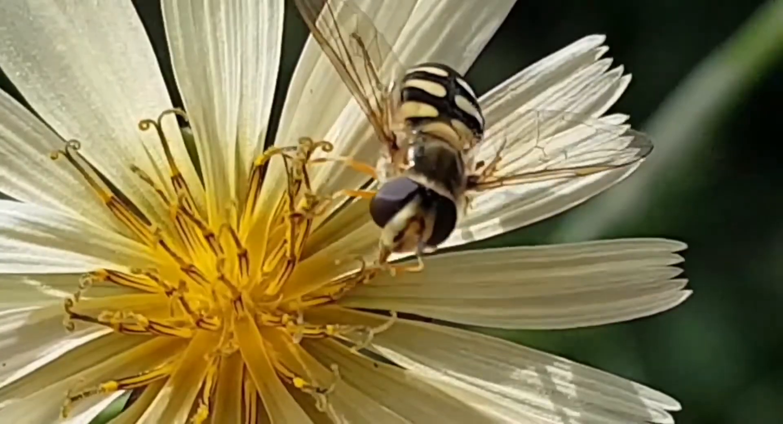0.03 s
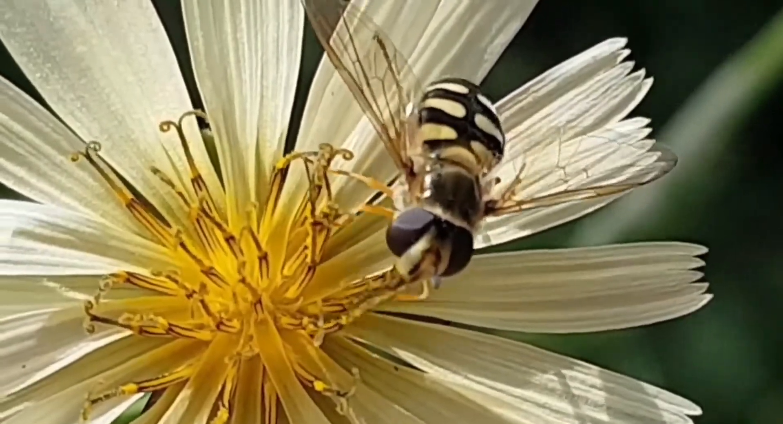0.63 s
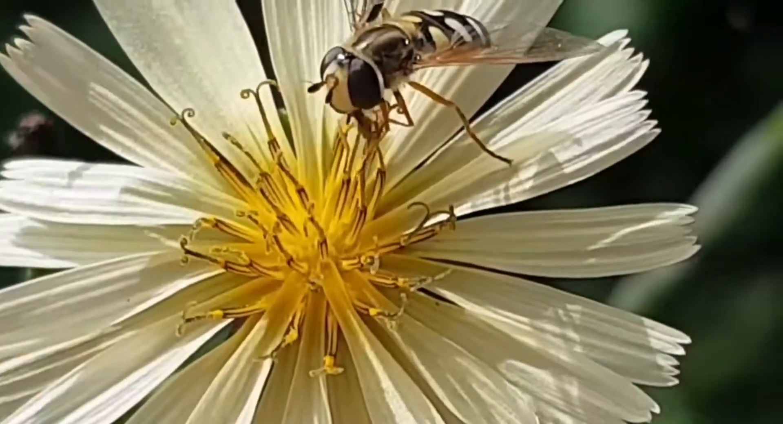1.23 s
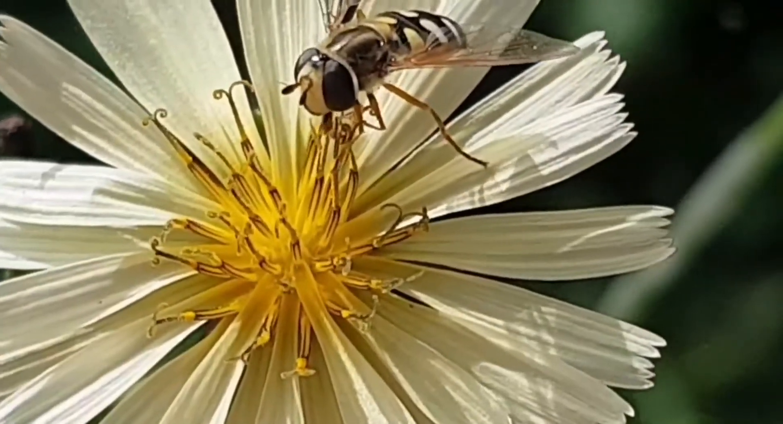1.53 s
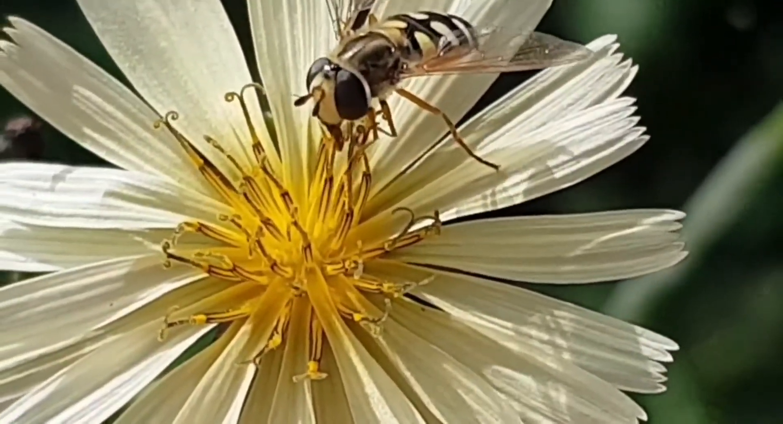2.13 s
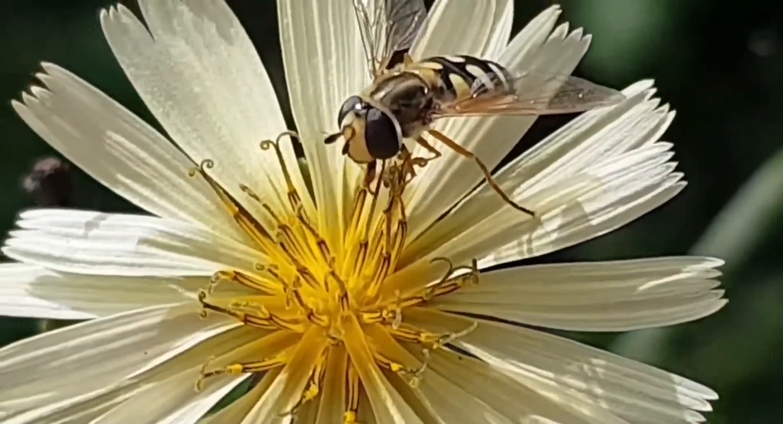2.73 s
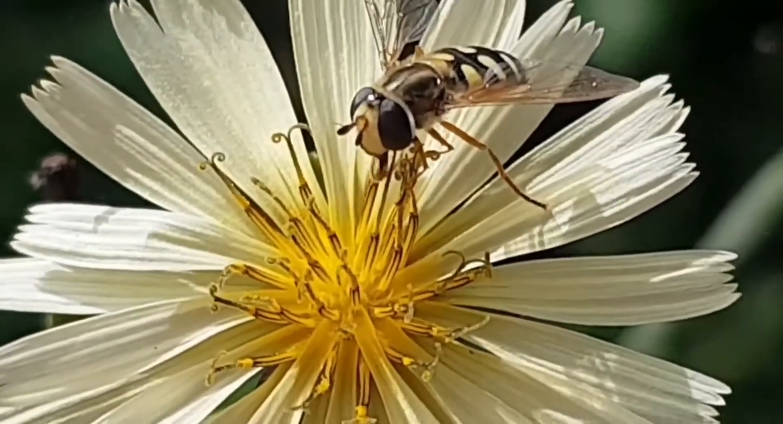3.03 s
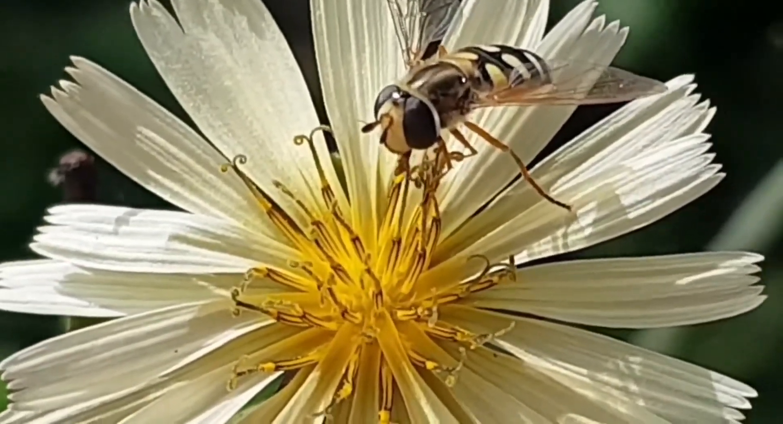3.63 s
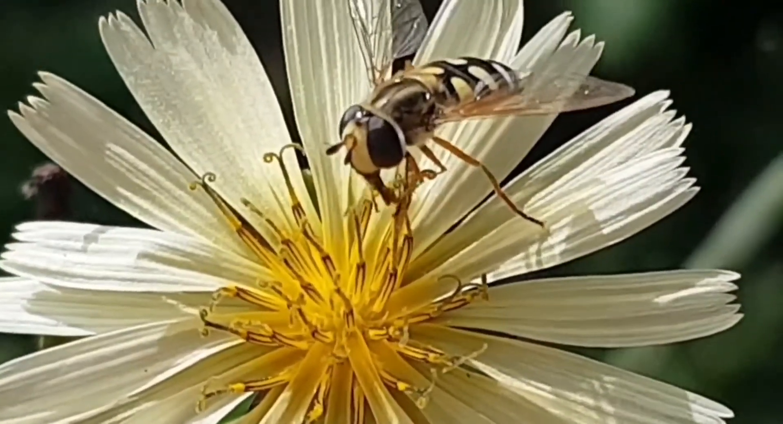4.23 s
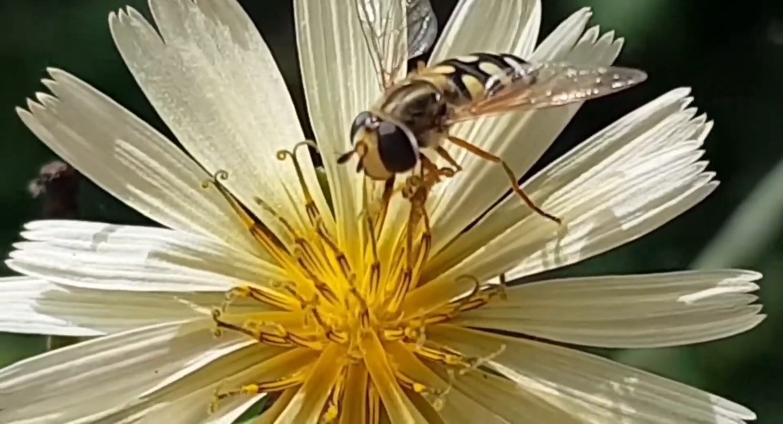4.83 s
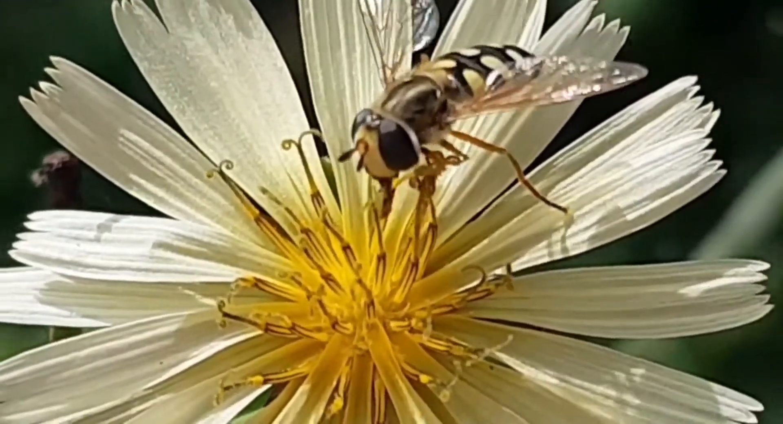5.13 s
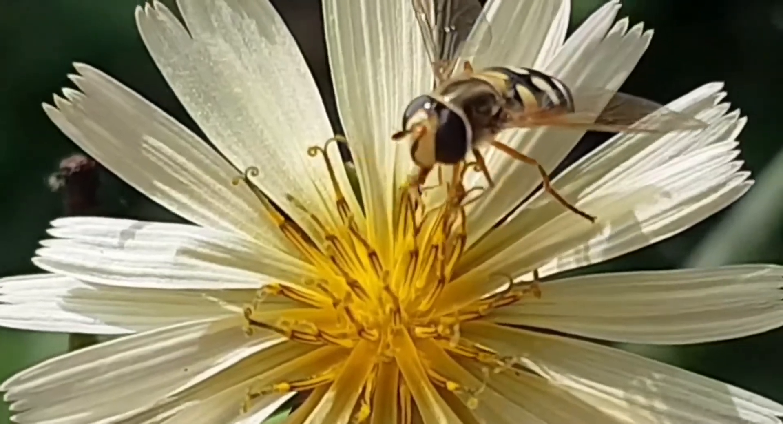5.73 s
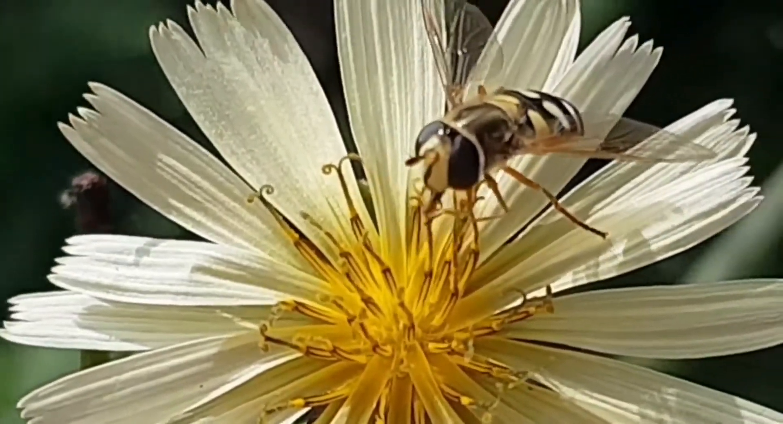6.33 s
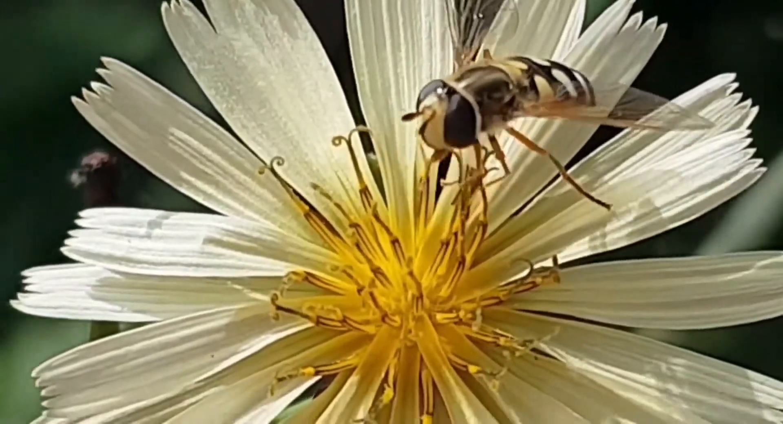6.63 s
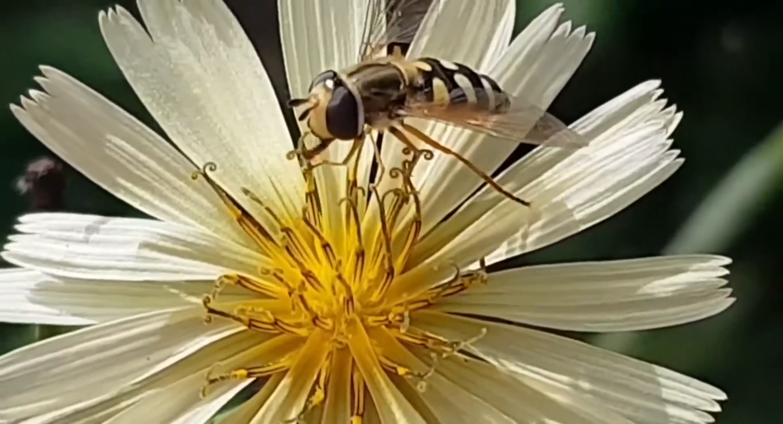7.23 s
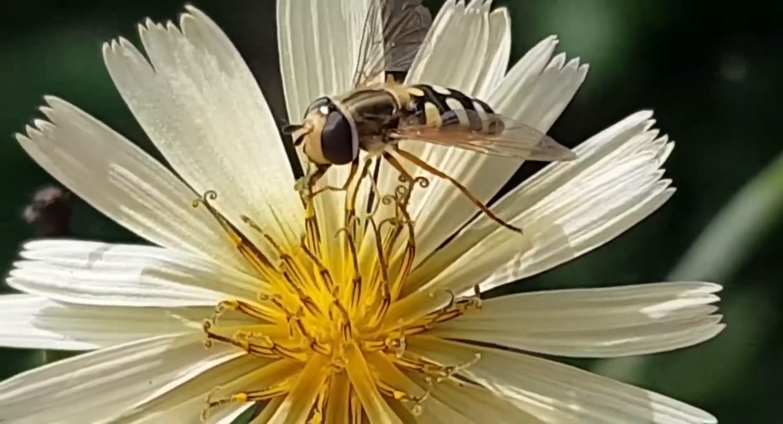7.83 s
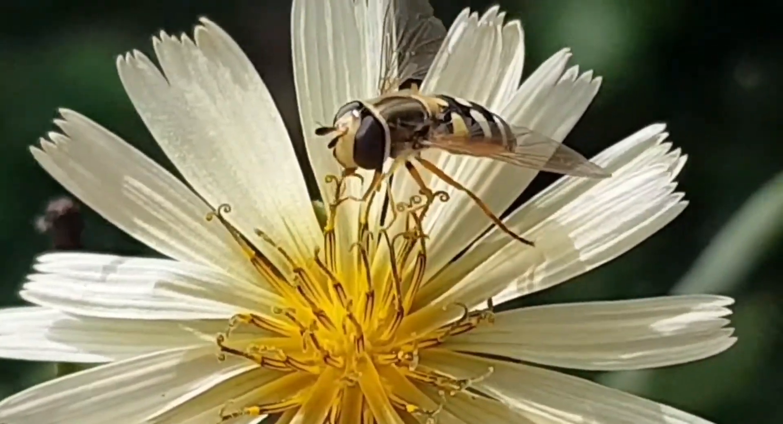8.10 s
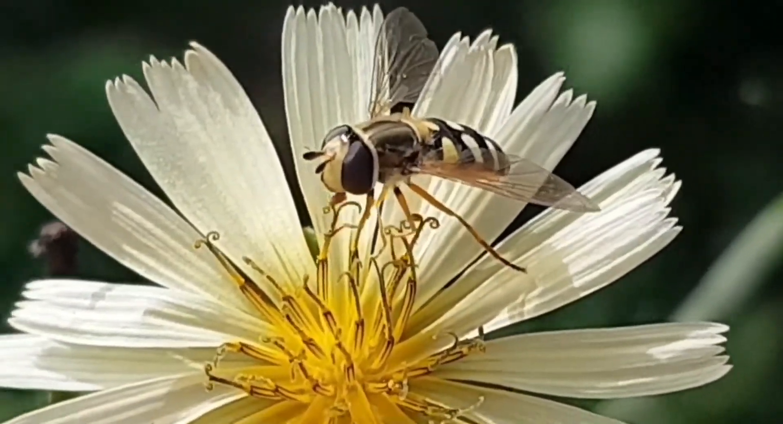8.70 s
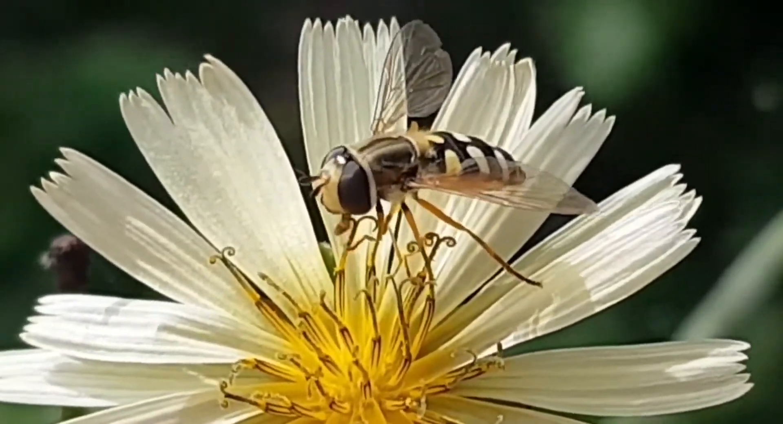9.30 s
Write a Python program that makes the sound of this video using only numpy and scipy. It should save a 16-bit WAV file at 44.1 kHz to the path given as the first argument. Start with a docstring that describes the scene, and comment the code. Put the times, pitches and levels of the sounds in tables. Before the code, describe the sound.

Crickets trill and chirp over pulsing cicadas outdoors, with distant traffic and a low, gusting rumble like wind underneath.

```python
"""A fast, high cricket trill opens on a summer field edge, over far crickets, cicadas and a distant road.
Crickets scrape their wings in short falling tones; cicadas click their ringing bodies in swelling phrases.
Tyres roar, vehicle bodies boom, and a far engine drones under a low, gusting rumble like wind.
A field cricket joins in bouts of chirps. At 1.16 s the level dips briefly and the fast trill gives way
to a slower, lower one. From there a few vehicles swell past and one hums away into the distance."""
import sys
import numpy as np
from scipy import signal
from scipy.fft import rfft, irfft, next_fast_len
from scipy.io import wavfile
from scipy.ndimage import uniform_filter1d, map_coordinates

SR = 44100
rng = np.random.default_rng(int(sys.argv[2]) if len(sys.argv) > 2 else 0)


def bounce(signal):
    """Save signal as a 16-bit WAV file at the path given by the first command-line argument."""
    frames = np.transpose(np.atleast_2d(signal))
    limited = np.clip(frames, -1, 1)
    pcm = np.round(limited * 32767).astype(np.int16)
    wavfile.write(sys.argv[1], SR, pcm)


N = 421596
T = np.arange(N) / SR
HANDOVER_S = 1.162  # the fast trill gives way to the slow one


def amp(db):
    """Decibels to gain."""
    return 10 ** (np.asarray(db) / 20)


def unit(x):
    """Scale to rms 1."""
    return x / np.sqrt(np.mean(x ** 2) + 1e-20)


def along(points, hz):
    """Read (frequency, value) points on a log frequency axis."""
    freqs, values = np.transpose(points)
    return np.interp(np.log(hz + 1), np.log(freqs + 1), values)


def curves(rows):
    """One automation curve for each column after the time."""
    times, *columns = np.transpose(rows)
    return [np.interp(T, times, column) for column in columns]


def wobble(rate):
    """A smooth random curve, rate knots a second."""
    return map_coordinates(rng.standard_normal(int(N * rate / SR) + 4), [T * rate])


def filtered(x, response):
    """Filter x by a complex frequency response."""
    size = next_fast_len(N + SR // 4)
    return irfft(rfft(x, size) * response(np.fft.rfftfreq(size, 1 / SR)), size)[..., :N]


def coloured(x, spectrum):
    """x through an EQ curve, at rms 1."""
    return unit(filtered(x, lambda hz: amp(along(spectrum, hz))))


def strokes(times, level_db, length_s, top_hz, fall_hz, bend, taper, scatter_db,
            fall_spread=0, rasp=0, swell=0, rise_hz=0):
    """Wing strokes: the tone rises as the scraper gets going and falls as it slows; uneven teeth rasp."""
    progress = np.linspace(0, 1, int(length_s * SR))
    detune, phase, accent, jitter, droop = rng.standard_normal((len(times), 5)).T
    run_up = rise_hz * (1 - progress) ** 6
    fall = fall_hz * (1 + fall_spread * droop[:, None]) * progress ** bend
    pitch = (top_hz - run_up - fall) * (1 + .0014 * detune[:, None])
    onset = np.round((times - length_s / 2 + .0004 * jitter) * SR).astype(int)
    samples = np.clip(onset[:, None] + np.arange(len(progress)), 0, N)
    teeth = unit(uniform_filter1d(rng.standard_normal(N + 1), size=48))[samples]
    tone = np.sin(2 * np.pi * (np.cumsum(pitch, axis=1) / SR + phase[:, None]) + rasp * teeth)
    gain = np.sqrt(2) * amp(level_db + scatter_db * accent)
    pressure = signal.windows.tukey(len(progress), taper) * (1 + swell * (progress - .5))
    return np.bincount(samples.ravel(), (gain[:, None] * tone * pressure).ravel(), N + 1)[:N]


# Reverb of the leaves: (frequency [Hz], time to fade by 60 dB [s])
LEAF_DECAY = [(3000, 0.061), (8000, 0.18), (14000, 0.045)]
def foliage(x):
    """A scattered stereo echo that drifts between two tails as the leaves move."""
    hz, t, noise = signal.stft(rng.standard_normal((2, 2, SR // 3)), SR, nperseg=256)
    decay = amp(-60 * t / along(LEAF_DECAY, hz)[:, None])
    tails = signal.istft(noise * decay, SR, nperseg=256)[1]
    tails /= np.linalg.norm(tails, axis=-1, keepdims=True)
    echo_a, echo_b = signal.oaconvolve(x[None, None], tails, axes=-1)[..., :N]
    turn = np.pi * (T + wobble(.99))
    return np.cos(turn) * echo_a + np.sin(turn) * echo_b


def fast_trill():
    """A high cricket at about 28 strokes a second; a reflection on the left trails each stroke."""
    times = np.arange(.0152, HANDOVER_S - .02, 1 / 27.885)
    song = strokes(times, level_db=-48.7, length_s=.0195, top_hz=6595, fall_hz=240,
                   bend=.65, taper=1, scatter_db=.5)
    reflection = amp(-4.5) * np.interp(T - .00841, T, song)
    stereo = np.array([song * amp(-1.5) + reflection, song])
    return (stereo + amp(-12) * foliage(song)) * (T < HANDOVER_S)


# Far crickets merged into one band: (frequency [Hz], relative level [dB])
CHORUS_EQ = [(3500, -70), (4300, -52), (4850, -16), (5080, -13), (5280, -17), (5480, -5), (5750, -15),
             (6100, -18), (7500, -70)]
def far_crickets():
    """A shimmering chorus, a far trill that steps up at the handover, and one cricket's two strokes."""
    chorus_db = -71 + 2 * (T > HANDOVER_S) + 5.6 * np.tanh(wobble(45))
    chorus = amp(chorus_db) * coloured(rng.standard_normal((2, N)), CHORUS_EQ)
    times = np.arange(.047, N / SR, 1 / 18.9)
    trill = strokes(times, level_db=np.where(times < HANDOVER_S, -73, -66), length_s=.02,
                    top_hz=5100, fall_hz=400, bend=2, taper=.7, scatter_db=2)
    pair = strokes(np.array([.027, .071]), level_db=-58, length_s=.025, top_hz=5950, fall_hz=130,
                   bend=1.3, taper=.69, scatter_db=0)
    return chorus + trill * amp([[0], [-3]]) + amp(-2) * foliage(trill) + pair


# Ring of a cicada's body: (frequency [Hz], relative level [dB])
CICADA_EQ = [(5800, -24.5), (6400, -19.5), (6900, -11), (7350, 2), (7520, -2), (7720, 3.5), (7900, -2.5),
             (8070, -1), (8300, -10.5), (8550, -14.5), (8800, -17.5), (9300, -22), (11300, -21.5),
             (12200, -68)]
def tymbal(rate_hz, unsteady):
    """Unsteady clicks, as overtones around the 14th, ring a cicada's body and scatter in the trees."""
    jitter = unsteady * (wobble(260) + wobble(45) / 2)
    phase = 2 * np.pi * np.cumsum(rate_hz * (1 + jitter)) / SR
    overtones = sum(amp(-.75 * (k - 14) ** 2) * np.cos(k * phase) for k in range(11, 18))
    clicks = coloured(overtones, CICADA_EQ)
    return unit(clicks + amp(-9) * foliage(clicks))


# Back-to-back phrases: (start [s], click rate it sags towards [Hz], lull before it [dB])
CICADA_PHRASES = [(0, 569, -4), (0.419, 560, -4), (.85, 568, -6.5), (1.17, 527, -1), (1.56, 560, -1.5),
                  (1.94, 560, -3.5), (2.31, 558, -2.5), (2.69, 556, -3), (3.04, 564, -3.5),
                  (3.441, 569, -4.5), (3.84, 558, -2), (4.18, 563, -4), (4.56, 562, -6), (4.95, 560, -5),
                  (5.33, 560, -4.5), (5.72, 569, -6), (6.11, 566, -8), (6.53, 556, -5), (6.97, 558, -4.5),
                  (7.42, 549, -2), (7.67, 523.8, 0), (8.62, 541, 0), (9.06, 559, -3), (9.451, 560, -3.5)]
# How hard the cicadas sing: (time [s], relative level [dB], trim on the right [dB])
CICADA_EFFORT = [(0, -53.5, -2), (.65, -54.5, -0.5), (1.05, -53.5, -0.5), (1.75, -54.5, 3),
                 (2.15, -55.5, 1), (2.5, -54, 2), (2.9, -54.5, 1), (3.25, -54.5, .5), (4, -53.5, 0.5),
                 (4.4, -52.5, -2), (5.2, -53, 1), (5.55, -51.5, -1.5), (5.95, -51, -1), (6.3, -52.5, -3),
                 (6.75, -55.5, 1), (7.3, -53.5, -1), (7.65, -54, 1), (8.03, -51, -2), (8.17, -55, 2),
                 (8.45, -52.5, -1), (8.8, -53, 1), (9.3, -54, -2.5), (9.56, -54, 2)]
# How the cicadas sound on the right, dipping deep at 7-8 kHz: (frequency [Hz], gain [dB])
RIGHT_EQ = [(6000, -5), (7000, -16), (7500, -16), (8050, -7.5), (8500, -4), (9200, 6), (11000, -7)]
def cicadas():
    """A lead singer whose click rate sags through each phrase, a steadier neighbour and a far blur."""
    attack_s, release_s, neighbour_share = .12, .096, .42
    start, settled_hz, lull_db = np.transpose(CICADA_PHRASES)
    phrase = np.searchsorted(start, T, side="right") - 1
    age = T - start[phrase]
    length = np.diff(start, append=T[-1] + .19)[phrase]
    # In a longer phrase the lead sets out faster, runs steadier and stands out more.
    sag = 1 + (.035 + .024 * length) * np.exp(-age / .3)
    lead = tymbal(settled_hz[phrase] * sag, unsteady=.019 * np.exp(-length / .526))
    lead_share = .04 + .56 * length
    neighbour = tymbal(rate_hz=535 * (1 + .004 * wobble(1)), unsteady=.004)
    noise = rng.standard_normal((2, N)) + .37 * rng.standard_normal(N)
    blur = coloured(noise * amp(1.43 * wobble(180)), CICADA_EQ)
    backing = np.sqrt(neighbour_share) * neighbour + np.sqrt(1 - neighbour_share) * blur
    song = np.sqrt(lead_share) * lead + np.sqrt(1 - lead_share) * backing
    swell = np.clip(np.minimum(age / attack_s, (length - age) / release_s), 0, 1)
    dip_db = np.interp(T, start, lull_db) * (1 - swell)
    effort_db, right_db = curves(CICADA_EFFORT)
    flicker_db = .75 * wobble(25) + .45 * wobble(11)
    left, right = amp(effort_db + 6.5 + dip_db + flicker_db) * song
    right_coloured = filtered(right * amp(right_db), lambda hz: amp(along(RIGHT_EQ, hz)))
    return np.array([np.roll(left, 9), right_coloured])  # the left hears it 0.2 ms late


# How alike the background noise is left and right: (frequency [Hz], shared power [0-1])
COHERENCE = [(60, 0.89), (150, 0.97), (330, 0.93), (520, 0.77), (800, 0.71), (1200, 0.68), (1550, 0.47),
             (2050, 0.4), (3000, 0.23)]
def stereo_noise(spectrum, lag_s=.00043):
    """Noise from the right: a direct part that reaches the left late, and a diffuse part."""
    lag = lambda hz: np.exp(-1j * np.pi * hz * lag_s * np.array([[1], [-1]]))
    share = lambda hz: along(COHERENCE, hz)
    direct = filtered(rng.standard_normal(N), lambda hz: np.sqrt(share(hz)) * lag(hz))
    diffuse = filtered(rng.standard_normal((2, N)), lambda hz: np.sqrt(1 - share(hz)))
    return coloured(direct + diffuse, spectrum)


# Far tyre roar, nearer tyre hiss and body boom: (frequency [Hz], relative level [dB])
ROAR_EQ = [(60, -19.5), (180, -10), (400, -0.5), (550, -2.5), (780, -1), (1000, -4.5), (1500, -10),
           (2000, -16.5), (2600, -22), (3300, -28), (6000, -36.5)]
PASS_HISS_EQ = [(400, -10.5), (700, -13), (1000, 6), (1600, -0.5), (2200, -12), (3000, -17), (6000, -20),
                (12000, -25)]
BOOM_EQ = [(50, -21), (110, -8.5), (160, -4.5), (183, -2), (203, -1), (222, 0.5), (255, -2.5), (330, -11.5),
           (450, -7.5), (600, -33), (1500, -46.5)]
# Ebb and flow of the road: (time [s], relative roar [dB], relative boom [dB])
TRAFFIC_FLOW = [(0, -56, -57.5), (.7, -54, -62), (.95, -54, -58.5), (1.6, -53.5, -68), (2, -53.5, -55.5),
                (2.3, -53.5, -58), (2.65, -53.5, -52), (2.85, -53.5, -52), (3, -54.5, -51),
                (3.25, -54, -54.5), (4.7, -54, -55), (5.8, -55, -56), (6.5, -55.5, -60),
                (7.5, -55.5, -58.5), (8, -55, -57.5), (8.3, -55.5, -58), (9.56, -55, -61)]
# Passing vehicles: (peak time [s], half-width [s], tyre hiss [dB], body boom [dB])
VEHICLE_PASSES = [(1.24, 0.12, -47.5, -47), (1.72, 0.29, -54, -47), (4.75, 0.16, -53.5, -71)]
def traffic():
    """Tyres roar and vehicle bodies boom; after the handover single passes swell out of the flow."""
    nearness = np.array([(T >= HANDOVER_S) / (1 + ((T - peak) / width) ** 2)
                         for peak, width, _, _ in VEHICLE_PASSES])
    peak_power = amp(np.transpose(VEHICLE_PASSES)[2:]) ** 2
    pass_hiss, pass_boom = np.sqrt(peak_power @ nearness)
    flow_roar, flow_boom = amp(curves(TRAFFIC_FLOW))
    roar = flow_roar * amp(7 + .51 * wobble(10)) * stereo_noise(ROAR_EQ)
    boom = np.hypot(flow_boom, pass_boom) * amp(1.5 * wobble(8)) * stereo_noise(BOOM_EQ)
    return roar + boom + pass_hiss * stereo_noise(PASS_HISS_EQ)


# Engine drone: (time [s], firing rate [Hz], share of the low end's power [0-1])
ENGINE_REVS = [(0, 79.2, 0.7), (1.14, 77.8, 0.5), (1.55, 62.6, 0.3), (1.85, 58, 0.7), (2.75, 55, 0.54),
               (3.05, 60, 0.55), (3.3, 72.4, 0.72), (3.7, 81, 0.56), (4.25, 69.4, 0.74), (4.55, 58, 0),
               (5.9, 54, 0), (6.9, 54, 0.51), (7.5, 57.15, 0.43), (8.88, 60.75, 0.89), (9.56, 60, 0.5)]
# Colour of the wind-like rumble: (frequency [Hz], relative level [dB])
RUMBLE_EQ = [(15, -58), (30, -19), (44, -11), (54, 4), (68, -2.5), (85, -1.5), (110, -12), (220, -44),
             (600, -90)]
# Bed of the low end: (time [s], level [dB])
LOW_BED = [(0, -68), (1.155, -62.5), (1.185, -58), (2, -58), (2.3, -61.5), (3, -63), (3.3, -57), (3.7, -54),
           (4.55, -60), (4.8, -69), (5.6, -63), (7.1, -67.5), (7.4, -59.5), (7.8, -63), (8.35, -62.5),
           (8.7, -51.5), (9.05, -70), (9.56, -62)]
# Gusts over that bed: (centre [s], length [s], peak level [dB])
GUSTS = [(1.32, 0.29, -50.5), (1.83, 0.3, -49.5), (2.01, .15, -53), (2.518, 0.15, -54.5),
         (2.778, 0.31, -51.5), (3.125, 0.25, -51), (3.894, 0.087, -47), (4.09, 0.089, -47),
         (4.293, 0.13, -55), (4.581, .22, -57), (5.403, 0.16, -61), (5.599, 0.12, -54.5),
         (5.967, 0.17, -56), (6.19, 0.2, -61), (6.438, .2, -53.5), (6.858, 0.21, -56), (7.544, 0.22, -57),
         (7.851, 0.17, -57), (8.162, 0.17, -56), (8.845, 0.2, -50.5)]
def engine_and_gusts():
    """A far engine's firing tone, with half and third orders, under a low, gusting rumble like wind."""
    firing_hz, share = curves(ENGINE_REVS)
    phase = 2 * np.pi * np.cumsum(firing_hz * (1 + .0053 * wobble(12))) / SR
    half_order_db = -1.5 - (firing_hz.max() - firing_hz)  # fades 1 dB per Hz as the revs drop
    drone = np.sin(phase) + amp(half_order_db) * np.sin(phase / 2) + amp(-13) * np.sin(3 * phase)
    bed = amp(curves(LOW_BED)[0] + 2.4 * wobble(10))
    gusts = sum(amp(db) * np.cos(np.pi * np.clip((T - centre) / length, -.5, .5))
                for centre, length, db in GUSTS)
    low_end = np.sqrt(share) * unit(drone) + np.sqrt(1 - share) * stereo_noise(RUMBLE_EQ)
    return np.hypot(bed, gusts) * low_end  # drone and rumble ride one fader


# Colour of the air: (frequency [Hz], relative level [dB])
AIR_EQ = [(1500, -2), (3300, -12), (3800, 9), (4500, 4.5), (6300, 2), (9800, -8), (12000, -6),
          (15700, -3.5)]
def air():
    """A faint, wide, steady hiss."""
    return amp(-66.5) * coloured(rng.standard_normal((2, N)), AIR_EQ)


# Chirps in four bouts: (first stroke [s], strokes [count])
CHIRP_CUES = [(.549, 1), (.712, 3), (.904, 4), (1.108, 3), (1.262, 4), (1.461, 4), (1.661, 4), (1.853, 4),
              (3.344, 2), (3.499, 4), (3.699, 4), (3.897, 4), (4.095, 4), (4.3, 4), (5.723, 3), (5.894, 4),
              (6.096, 4), (6.298, 4), (6.5, 4), (6.704, 4), (6.905, 4), (8.319, 3), (8.516, 3), (8.704, 4),
              (8.906, 4), (9.105, 4), (9.308, 4), (9.51, 3)]
# Fader from bout to bout: (time [s], level [dB])
BOUT_LEVELS = [(2, -58.3), (3.3, -60.5), (5.7, -59.8), (8.3, -61.4)]
def field_cricket(spacing_s=.018, first_stroke_db=-3):
    """Chirps on the left: up to four steeply falling wing strokes each, with a softer first stroke."""
    times, accent_db = np.transpose([(start + k * spacing_s, first_stroke_db * (k == 0))
                                     for start, count in CHIRP_CUES for k in range(count)])
    levels = np.interp(times, *np.transpose(BOUT_LEVELS)) + accent_db
    song = strokes(times - .001, level_db=levels, length_s=.012, top_hz=5180, fall_hz=960,
                   bend=1.4, taper=.85, scatter_db=1.2, fall_spread=.12, rasp=.25)
    return song * amp([[0], [-12]]) + amp([[-6], [-7]]) * foliage(song)


# Hum of the departing vehicle: (time [s], pitch [Hz], level [dB])
RECEDING_HUM = [(1.17, 198, -59), (1.5, 202, -57), (2.1, 200, -62), (2.5, 190, -60), (2.8, 200, -64),
                (3.1, 186, -60), (3.35, 205, -61), (3.9, 205, -63.5), (4.6, 203, -72), (9.56, 203, -80)]
def receding_vehicle():
    """A wavering hum that enters at the handover and fades as the vehicle moves away."""
    pitch_hz, level_db = curves(RECEDING_HUM)
    gain = (T >= HANDOVER_S) * np.sqrt(2) * amp(level_db + 2 * wobble(14))
    phase = 2 * np.pi * np.cumsum(pitch_hz * (1 + .022 * wobble(20))) / SR
    return gain * np.sin(phase)


# Tempo of the near cricket: (time [s], pace [strokes/s])
SLOW_TRILL_PACE = [(1.17, 19.605), (5.3, 19.607), (6.5, 19.63), (8, 19.635), (8.8, 19.61)]
# Strokes on which its scraper slips: (time [s])
SCRAPER_SLIPS = [3.114, 5.359]
def slow_trill(entry_s=1.1728, level_db=-50.5):
    """A near cricket's loud strokes, each trailed by a faint short echo; twice the scraper slips and a stroke
    breaks into three."""
    count = np.cumsum(curves(SLOW_TRILL_PACE)[0] * (T > entry_s)) / SR
    times = np.interp(np.arange(count[-1]) + .001, count, T)
    clean = times[np.abs(times[:, None] - SCRAPER_SLIPS).min(axis=1) > .02]
    direct = strokes(clean - .0008, level_db, length_s=.0202, top_hz=5254, fall_hz=330, bend=3.8,
                     taper=.6, scatter_db=.6, fall_spread=.24, rasp=.13, swell=.2, rise_hz=100)
    after_echo = strokes(clean + .0098, level_db=-63.5, length_s=.011, top_hz=5240, fall_hz=150,
                         bend=1.2, taper=.9, scatter_db=3, fall_spread=.5)
    song = direct + after_echo
    for offset_s, hz in [(-.009, 5330), (0, 5240), (.008, 5120)]:
        song += strokes(np.add(SCRAPER_SLIPS, offset_s), level_db - 1, length_s=.007,
                        top_hz=hz, fall_hz=200, bend=1, taper=.9, scatter_db=1)
    reverb = foliage(np.interp(T - .008, T, song))
    return song + amp([[-10], [-13]]) * reverb


def scene():
    """Insects over the road, a gusting rumble and a faint hiss of air."""
    insects = fast_trill() + far_crickets() + cicadas() + field_cricket() + slow_trill()
    backdrop = traffic() + engine_and_gusts() + receding_vehicle()
    return insects + backdrop * amp([[.8], [-.8]]) + air()


def record(dry, top_hz=15800):
    """The level dips briefly at the handover; nothing passes above the band limit."""
    dip = 1 - .78 * np.exp(-((T - HANDOVER_S) / .004) ** 4)
    return filtered(dry * dip, lambda hz: hz < top_hz)


dry = scene()
out = record(dry)
bounce(out)
```